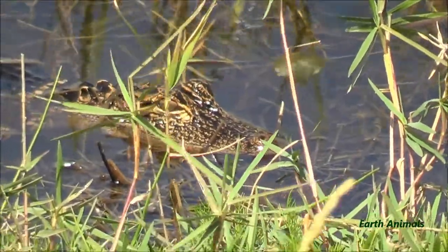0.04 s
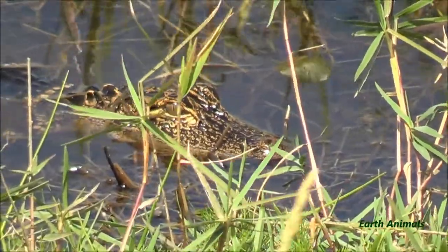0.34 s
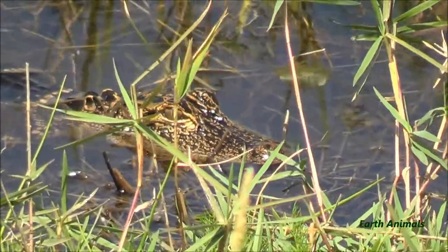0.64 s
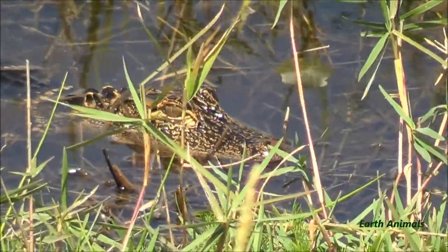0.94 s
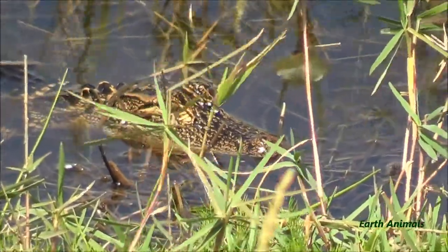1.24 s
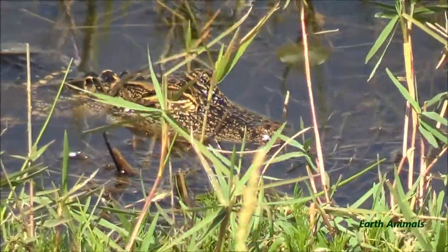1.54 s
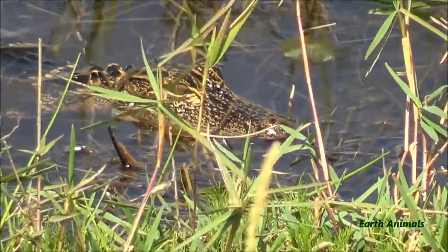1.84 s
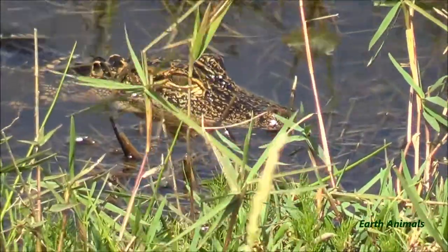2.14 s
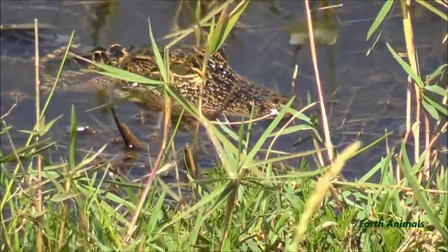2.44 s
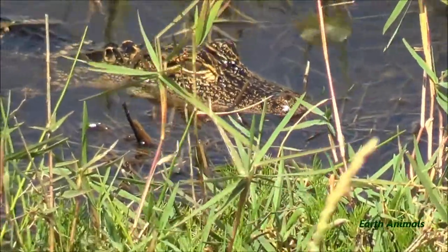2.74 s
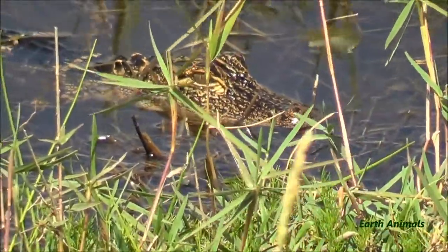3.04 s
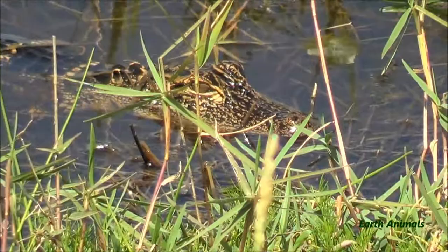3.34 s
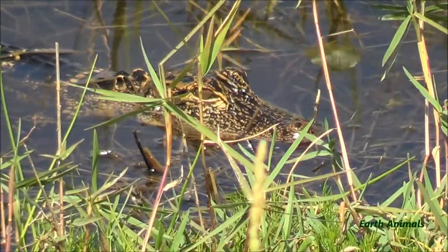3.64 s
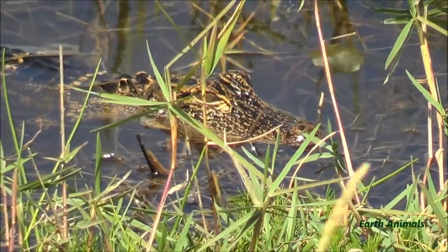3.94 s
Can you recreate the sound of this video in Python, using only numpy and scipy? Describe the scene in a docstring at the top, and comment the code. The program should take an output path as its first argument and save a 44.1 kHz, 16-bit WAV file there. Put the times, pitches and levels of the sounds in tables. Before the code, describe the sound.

Buzzy trills and short, harsh squawks from shore birds, over gusty wind rumble.

```python
"""A reedy shore. Water birds, probably terns, give buzzy trills, faint chips and falling squawks;
in a squawk the two sides of the syrinx sing different notes and modulate each other.
Shallow water slops in clouds of tiny bubbles. Calls and splashes carry a short echo and a brief,
shifting smear that makes left and right differ, mostly in the treble.
Gusts buffet a small stereo microphone. Behind: a quiet outdoor hiss and a thin electronic whine."""
import sys
import numpy as np
from scipy import signal
from scipy.fft import rfft, irfft
from scipy.io import wavfile
from scipy.ndimage import uniform_filter1d

SR = 44100
rng = np.random.default_rng(int(sys.argv[2]) if len(sys.argv) > 2 else 0)


def materialize(psi):
    """Save the field psi as 16-bit PCM at rate SR to the path in sys.argv[1].

    A 1-D psi becomes a single channel; in a 2-D psi each row is a channel.
    """
    bounded = np.clip(np.atleast_2d(psi).T, -1, 1)
    quanta = np.round(bounded * 32767).astype(np.int16)
    wavfile.write(sys.argv[1], SR, quanta)


N = 176400

# Trills (start [s], length [s], source level [dB], warble rate [Hz], top [Hz], bottom [Hz], pips [dB],
# loudest pip [share of length], jitter [share of pitch], final sag [share of pitch])
TRILL_CALLS = [(-.081, 0.15, -27, 59, 4000, 2940, -11, .5, 0.03, 0.02),
               (0.231, 0.13, -23.5, 60, 4044, 2937, -15, 0.33, 0.06, 0.19),
               (0.537, .17, -28, 66, 3690, 2810, -10.5, 0.27, 0.04, 0.08),
               (.707, 0.11, -32.5, 66, 3823, 2850, -4, 0.36, 0.05, 0),
               (0.944, 0.16, -43.5, 73, 4350, 3490, -6, 0.47, 0.06, 0.05),
               (1.08, .26, -31.5, 66, 3940, 2957, 0, 0.5, 0.07, 0.05),
               (1.379, .125, -21.5, 58, 3650, 2750, 5, .37, .015, .13),
               (1.591, 0.28, -30.5, 71, 4076, 2880, 1.5, 0.34, 0.08, 0.16),
               (2.128, .24, -31.5, 61, 4085, 2988, -0.5, .42, 0.13, .08),
               (2.63, .25, -31, 66, 4100, 2985, 4.5, 0.5, 0.09, 0.03),
               (3.107, .27, -27.5, 62.5, 4090, 2800, 1.5, 0.35, 0.08, 0),
               (3.617, 0.23, -27, 65, 4115, 2695, -5, 0.46, 0.04, 0.06)]
# Throat response in a trill (frequency [Hz], gain [dB])
TRILL_THROAT_EQ = [(1500, -19.5), (2400, -6.5), (3100, -2.5), (3700, 3), (4300, 0.5), (4850, -0.5),
                   (5500, -1), (6400, -5.5), (7700, -2.5), (9300, -11.5), (12000, -8.5), (13500, -18),
                   (15000, -30)]
# Direct sound at the microphone ports (frequency [Hz], left minus right [dB], left lead [rad])
PORT_DIFFERENCES = [(1400, 6, 0.16), (2560, 5, -0.093), (3700, 0, -0.26), (4230, 5.5, -0.25),
                    (7000, 11.5, 1), (12600, 4, 1)]
# Diffuse smear and shore echo (frequency [Hz], smear [dB], echo [dB], echo T60 [s])
WET_RESPONSE = [(1310, -4.5, -10.5, 0.52), (2270, -18, -5, 0.36), (3350, -8, -4.5, 0.43),
                (4300, -2.5, -6.5, 0.32), (4950, -3, -5.5, 0.72), (7630, 4, -4, 0.34),
                (13800, -28, 1, 0.21)]
# Hiss spectrum (frequency [Hz], relative density [dB])
HISS_EQ = [(90, -3.5), (150, 1.5), (430, -3.5), (1160, -5), (1750, -8.5), (2400, -4), (3400, -10),
           (4600, -7.5), (7300, -14), (9100, -14), (12000, -19), (15500, -41.5)]
# Hiss course (time [s], level [dB])
HISS_LEVELS = [(.9, -42), (1.6, -38.5), (4, -36)]
# Gusts (centre [s], width [s], level [dB])
WIND_GUSTS = [(0.093, 0.06, -21), (0.149, 0.022, -15), (.355, 0.02, -10.5), (0.437, 0.067, -25),
              (0.505, 0.025, -20), (0.579, 0.023, -24.5), (0.879, 0.025, -12.5), (0.956, 0.036, -22),
              (1.29, 0.057, -17), (1.35, 0.07, -23.5), (1.444, 0.025, -22), (1.579, 0.018, -23.5),
              (1.74, 0.057, -27), (2.025, 0.015, -16), (2.385, 0.027, -10.5), (2.429, 0.021, -17),
              (2.703, 0.053, -15), (2.769, 0.01, -19), (2.845, 0.049, -12), (3.034, 0.066, -23.5),
              (3.162, 0.015, -19), (3.255, 0.1, -21.5), (3.41, 0.016, -16.5), (3.531, 0.016, -16.5),
              (3.907, 0.021, -24), (3.99, 0.046, -16)]
# Wind buffet spectrum (frequency [Hz], gain [dB])
BUFFET_EQ = [(15, -7.5), (35, -3.5), (80, 1.5), (160, -3), (230, -12), (330, -21), (600, -36.5),
             (1500, -50), (5000, -90)]
# Added spectrum of hard gusts (frequency [Hz], gain [dB])
BURST_EQ = [(40, -4), (130, 0.5), (230, 3.5), (330, -7.5), (550, -17), (1000, -28), (3000, -61),
            (8000, -75)]
# Distant chips (start [s], length [s], source level [dB], first pitch [Hz], last pitch [Hz])
CHIP_CALLS = [(0.165, 0.023, -36.5, 3130, 2700), (0.469, 0.0244, -32.5, 3120, 2735),
              (1.328, 0.019, -36, 3100, 2560), (2.711, 0.0094, -37, 1920, 1340),
              (3.902, 0.015, -34, 3010, 2020)]
# Hoarse noise of chips and squawks (frequency [Hz], gain [dB])
RASP_EQ = [(900, -19), (1900, -5), (2400, 11), (3300, -15), (4800, -13), (7500, -12), (9500, -4),
           (11500, -18), (15000, -56)]
# Splashes (start [s], length [s], source level [dB], centre bubble pitch [Hz])
SHALLOW_SPLASHES = [(.978, 0.036, -42.5, 1760), (1.009, 0.043, -39.5, 2150), (1.06, 0.023, -43.5, 1740),
                    (1.116, 0.011, -42, 1400), (1.18, .012, -40, 1530)]
# Squawks (start [s], length [s], source level [dB], low pitch [ratio], high pitch [ratio],
# high voice offset [dB])
SQUAWK_CALLS = [(1.607, 0.15, -26, 1.007, 1.03, -0.5), (1.843, 0.13, -27, 1.01, 1.015, 1.5),
                (2.082, .13, -24.5, 1.0, 1.015, -0.5), (2.385, 0.12, -27.5, 0.99, 0.99, 3.5),
                (2.84, .128, -26.5, .99, .98, 3.5), (3.164, 0.12, -27.5, .98, 0.99, 6.5),
                (3.915, 0.15, -30.5, .97, 0.94, 9)]
# Squawk course (time [share of length], low voice [Hz], high voice [Hz], low voice [dB], high voice [dB])
SQUAWK_COURSE = [(0, 1367, 4880, -12, -31), (.1, 1616, 4750, -1, -17.5), (.2, 1604, 4450, -1, -11.5),
                 (.35, 1423, 3972, -3.5, -1), (.55, 1244, 3477, -9, -1.5), (.75, 1135, 3130, -12.5, 0),
                 (.88, 1107, 2832, -16.5, -9.5), (1, 1090, 2386, -65, -4.5)]
# Arched yelp course, columns as SQUAWK_COURSE
YELP_COURSE = [(0, 1314, 2160, -25, -9), (.07, 1445, 2708, -17, -6), (.13, 1592, 3742, -5.5, 0.5),
               (.2, 1604, 3920, -5, -0.5), (.42, 1535, 3390, -5.5, 0.5), (.66, 1530, 3080, -13, -6),
               (.77, 1420, 2850, -29, -2.5), (.87, 1390, 2470, -47, 2.5), (1, 1340, 2050, -37, -17)]
# Overtones, sum and difference tones (low voice [multiple], high voice [multiple], gain [dB])
SYRINX_PARTIALS = [(2, 0, -3), (3, 0, -3), (4, 0, -3), (5, 0, -12.5), (-1, 1, -1), (1, 1, -7.5),
                   (-1, 2, -25), (0, 2, -12), (1, 2, -10.5), (0, 3, -19)]
# Throat response in squawks and yelp (frequency [Hz], gain [dB])
SQUAWK_THROAT_EQ = [(900, -7), (1300, 2), (1620, -1), (1850, -6), (2300, 6.5), (2700, 1.5), (3400, 0),
                    (4000, -7.5), (4700, -6.5), (5400, -2), (6300, -4), (7500, 2), (9500, -0.5),
                    (11500, 8.5), (15000, 4)]

TIME_S, BINS_HZ = np.arange(N) / SR, np.fft.rfftfreq(2 * N, 1 / SR)


def amp(db):
    """Decibels to gain."""
    return 10 ** (np.asarray(db) / 20)


def unit(x):
    """Scale to rms 1."""
    return x / np.sqrt(np.mean(x ** 2) + 1e-20)


def lookup(table, hz, column=1):
    """Interpolate a column over log frequency."""
    columns = np.transpose(table)
    return np.interp(np.log(hz + 1), np.log(columns[0] + 1), columns[column])


def colour(x, eq):
    """Filter by a table of (frequency [Hz], gain [dB])."""
    return irfft(rfft(x, 2 * N) * amp(lookup(eq, BINS_HZ)))[..., :N]


def add(mix, start_s, sound):
    """Mix in at start_s, cropped to fit."""
    at = round(start_s * SR)
    sound = sound[max(-at, 0):]
    part = mix[max(at, 0):][:len(sound)]
    part += sound[:len(part)]


def noise_pair(correlation):
    """Stereo white noise, partly correlated."""
    a, b = rng.standard_normal((2, N))
    return np.array([a, correlation * a + np.sqrt(1 - correlation ** 2) * b])


def wobble(t, hz):
    """Smooth noise, rms 1, up to about hz."""
    return unit(np.interp(t * 2 * hz, np.arange(2048), rng.standard_normal(2048)))


def phase(t, hz, jitter, jitter_hz=348.1):
    """Phase [rad] of a voice with trembling pitch."""
    return 2 * np.pi * np.cumsum(hz * (1 + jitter * wobble(t, jitter_hz))) / SR


def flutter(t):
    """Fast random tremble in a voice's gain."""
    return 1 + .26 * wobble(t, hz=221.8)


def edges(t, ramp_s=.0024):
    """Fade a call in and out."""
    return np.clip(np.minimum(t, t[-1] - t) / ramp_s, 0, 1)


def rasp(envelope, eq=RASP_EQ):
    """Hoarse throat noise following a call's envelope."""
    return envelope * unit(colour(rng.standard_normal(N), eq))


def trills(quickening=.12, skew_rad=.4, pip_hz=4240, pip_spread=.24, rasp_db=-1):
    """A hoarse warble swells and sags in pitch; the other side of the syrinx pips on each crest."""
    voice, hoarseness = np.zeros((2, N))
    for start_s, length_s, db, rate_hz, top_hz, bottom_hz, pip_db, pip_peak, jitter, sag in TRILL_CALLS:
        t = np.arange(0, length_s, 1 / SR)
        share = t / length_s
        warble_hz = rate_hz * (1 + quickening * share + .012 * wobble(t, rate_hz))
        cycle = 2 * np.pi * np.cumsum(warble_hz) / SR
        swing = .5 + .5 * np.cos(cycle + skew_rad * (1 - np.cos(cycle)))
        crests = swing ** 8
        pitch_hz = (bottom_hz + (top_hz - bottom_hz) * swing) * (1 - sag * share ** 3)
        angle = phase(t, pitch_hz, jitter)
        swell = np.sqrt(2) * amp(np.interp(share, [0, .72, 1], [-16, 0, -6]))
        harshness = amp(-9 + 2 * (1 - share) ** 2)
        overtones = np.sin(2 * angle) + amp(-5) * np.sin(3 * angle) + amp(-3) * np.sin(1.5 * angle)
        warble = swell * (np.sin(angle) * (1 - .5 * crests) + harshness * overtones) * flutter(t)
        pip_gain = 2 * amp(pip_db) * np.exp(-abs(share - pip_peak) / pip_spread) * crests
        pips = pip_gain * np.sin(phase(t, pip_hz, jitter=.005))
        envelope = amp(db) * edges(t)
        add(voice, start_s, envelope * (warble + pips))
        add(hoarseness, start_s, envelope * swell * harshness)
    return colour(voice, TRILL_THROAT_EQ) + amp(rasp_db) * rasp(hoarseness, TRILL_THROAT_EQ)


def diffuse_smear(x, patterns=7, crossfade_s=.13, t60_s=.061):
    """Brief, shifting smear, different left and right; random impulses crossfade in turn."""
    decay = np.exp(-np.log(1000) * TIME_S[:2048] / t60_s)
    smear = np.zeros((2, N))
    for k in range(patterns):
        impulse = rng.standard_normal((2, len(decay))) * decay
        impulse /= np.linalg.norm(impulse[0])
        crossfade = np.sin(np.pi / 2 * np.minimum((TIME_S / crossfade_s - k) % patterns, 2))
        smear += signal.oaconvolve((x * crossfade)[None], impulse, axes=1)[:, :N]
    return smear


def echo_impulse():
    """Short open-air echo: noise with a decay time per band."""
    hz, t, bands = signal.stft(noise_pair(correlation=.94), SR, nperseg=256)
    t60_s = lookup(WET_RESPONSE, hz, column=3)[:, None]
    impulse = signal.istft(bands * np.exp(-np.log(1000) * t / t60_s) / np.sqrt(t60_s), SR, nperseg=256)[1]
    return impulse / np.linalg.norm(impulse[0])


def shore(x, shelf_hz=4900, shelf_db=-5, wet_left_over_right_db=2.6):
    """Direct sound and echo at the two microphone ports, plus a smear mostly in the treble."""
    spectrum = rfft(x, 2 * N)
    side = np.array([[.5], [-.5]])
    treble_db = shelf_db * (1 - 1 / (1 + (BINS_HZ / shelf_hz) ** 8))
    port_db = side * lookup(PORT_DIFFERENCES, BINS_HZ)
    lead_rad = side * lookup(PORT_DIFFERENCES, BINS_HZ, column=2)
    direct = spectrum * amp(port_db + treble_db) * np.exp(1j * lead_rad)
    echo = spectrum * rfft(echo_impulse(), 2 * N) * amp(lookup(WET_RESPONSE, BINS_HZ, column=2))
    smear = rfft(diffuse_smear(x), 2 * N) * amp(lookup(WET_RESPONSE, BINS_HZ))
    return irfft(direct + (smear + echo) * amp(side * wet_left_over_right_db))[:, :N]


def hiss():
    """Quiet outdoor hiss, slowly rising."""
    level_db = np.interp(TIME_S, *np.transpose(HISS_LEVELS))
    return amp(level_db) * unit(colour(noise_pair(correlation=.31), HISS_EQ))


def eddies(eq, correlation, window_s=.0175):
    """Turbulence at the ports, held at even strength."""
    noise = colour(noise_pair(correlation), eq)
    power = uniform_filter1d((noise ** 2).mean(0), round(window_s * SR))
    return noise / np.sqrt(abs(power) + 1e-20)


def wind(breeze_db=-38, knee_db=-18, burst_exponent=1.66):
    """Gusts thump the microphone over a light breeze; hard ones reach higher in frequency."""
    gust_power = sum(amp(db) ** 2 * np.exp(-(2 * (TIME_S - centre_s) / width_s) ** 2)
                     for centre_s, width_s, db in WIND_GUSTS)
    force = np.sqrt(amp(breeze_db) ** 2 + gust_power)
    burst = amp(knee_db - 6) * (force / amp(knee_db)) ** burst_exponent
    return force * eddies(BUFFET_EQ, correlation=.75) + burst * eddies(BURST_EQ, correlation=-.61)


def whine(hz=15734.5, rms_db=-49.5):
    """Thin, steady electronic tone."""
    return amp(rms_db) * np.sqrt(2) * np.sin(2 * np.pi * hz * TIME_S)


def chips(fade_db=-5, rasp_db=-9):
    """Birds farther off: very short, hoarse, falling notes."""
    voice, hoarseness = np.zeros((2, N))
    for start_s, length_s, db, first_hz, last_hz in CHIP_CALLS:
        t = np.arange(0, length_s, 1 / SR)
        angle = phase(t, np.linspace(first_hz, last_hz, len(t)), jitter=.06)
        envelope = amp(db) * unit(edges(t) * amp(fade_db * t / length_s))
        add(voice, start_s, np.sqrt(2) * envelope * np.sin(angle))
        add(hoarseness, start_s, envelope)
    return voice + amp(rasp_db) * rasp(hoarseness)


def splashes(bubble_count=40, decay_s=.00083, fade_db=-12):
    """Shallow water slops: each splash is a cloud of tiny, quickly damped bubbles."""
    water = np.zeros(N)
    for start_s, length_s, db, centre_hz in SHALLOW_SPLASHES:
        t = np.arange(0, length_s + 6 * decay_s, 1 / SR)
        onset_share, octave = rng.random((2, bubble_count, 1))
        age_s = np.maximum(t - onset_share * length_s, 0)
        hz = centre_hz * 2 ** (octave - .5)
        bubbles = amp(fade_db * onset_share) * np.exp(-age_s / decay_s) * np.sin(2 * np.pi * hz * age_s)
        polarity = rng.choice([-1, 1], onset_share.shape)
        add(water, start_s, amp(db) * unit((bubbles * polarity).sum(0)))
    return water


def syrinx(course, length_s, db, low_ratio=1, high_ratio=1, high_offset_db=0,
           high_jitter=.0088, low_overtones_db=0, hoarse_db=0):
    """Two sides sing different notes and modulate each other; returns voice and rasp envelope."""
    t = np.arange(0, length_s, 1 / SR)
    share, *columns = np.transpose(course)
    low_hz, high_hz, low_db, high_db = [np.interp(t / length_s, share, c) for c in columns]
    low_rad = phase(t, low_hz * low_ratio, jitter=.0068)
    high_rad = phase(t, high_hz * high_ratio, high_jitter)
    low_gain, high_gain = amp(low_db), amp(high_db + high_offset_db)
    voice = low_gain * np.sin(low_rad) + high_gain * np.sin(high_rad) * flutter(t)
    for m, n, partial_db in SYRINX_PARTIALS:
        gain = amp(partial_db) * (np.sqrt(low_gain) if m else 1)
        gain = gain * (high_gain if n else amp(low_overtones_db) * np.sqrt(high_gain))
        rough_rad = .23 * amp(hoarse_db) * (m + 3 * n) * wobble(t, hz=600)  # higher partials are rougher
        voice += gain * np.sin(m * low_rad + n * high_rad + rough_rad) * flutter(t)
    envelope = amp(db) * edges(t)
    hoarseness = envelope * amp(hoarse_db) * np.sqrt(high_gain * np.sqrt(low_gain))
    return np.sqrt(2) * envelope * voice, hoarseness


def squawks(yelp_start_s=3.504, rasp_db=-9):
    """Nearest bird: harsh falling squawks and one clearer yelp, shaped by its throat."""
    calls = [(start_s, syrinx(SQUAWK_COURSE, *row)) for start_s, *row in SQUAWK_CALLS]
    yelp = syrinx(YELP_COURSE, length_s=.12, db=-26, high_offset_db=4.5,
                  high_jitter=.0076, low_overtones_db=-10.5, hoarse_db=-4)
    voice, hoarseness = np.zeros((2, N))
    for start_s, (sound, rasp_envelope) in calls + [(yelp_start_s, yelp)]:
        add(voice, start_s, sound)
        add(hoarseness, start_s, rasp_envelope)
    return colour(voice, SQUAWK_THROAT_EQ) + amp(rasp_db) * rasp(hoarseness)


def scene():
    """Birds and water across the shore, plus wind and hiss."""
    return shore(squawks() + trills() + chips() + splashes()) + wind() + hiss()


def record(dry):
    """Add the whine, then band-limit."""
    cutoff_hz = 16150
    lowpass = signal.firwin(511, cutoff_hz, window=("kaiser", 9), fs=SR)
    return signal.oaconvolve(dry + whine(), lowpass[None], "same")


dry = scene()
out = record(dry)
materialize(out)
```